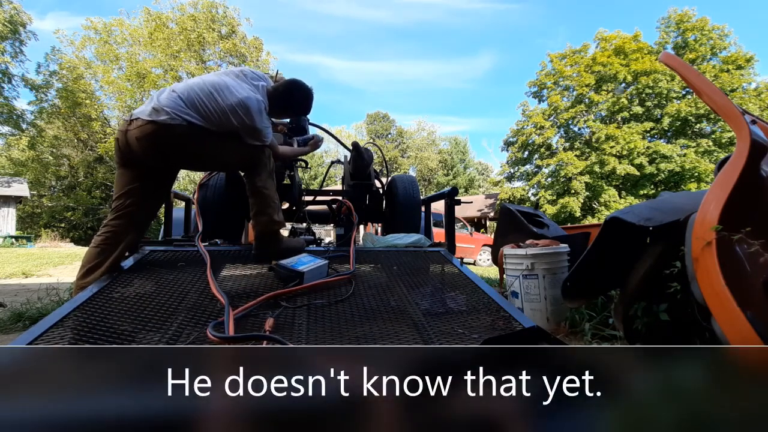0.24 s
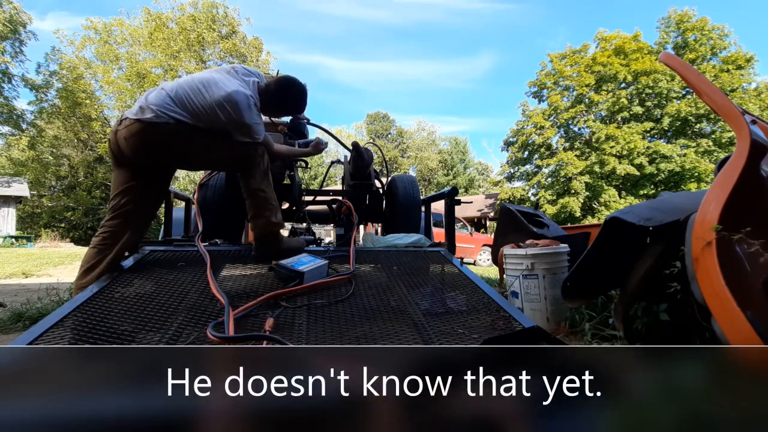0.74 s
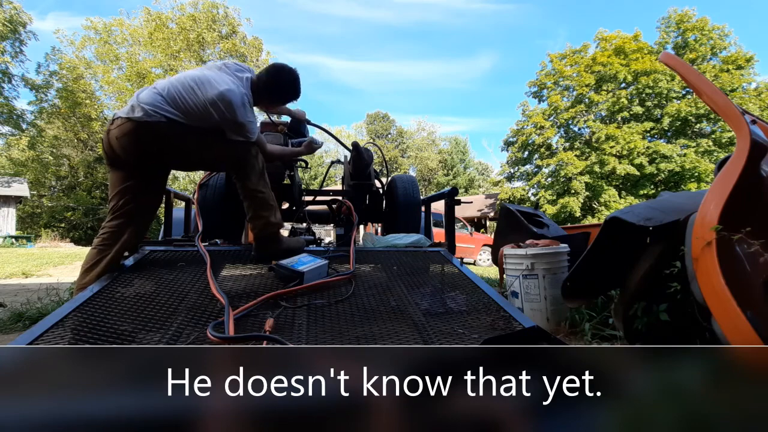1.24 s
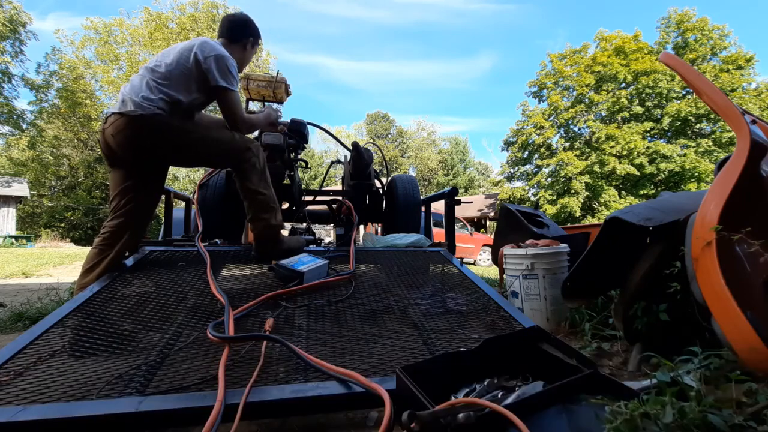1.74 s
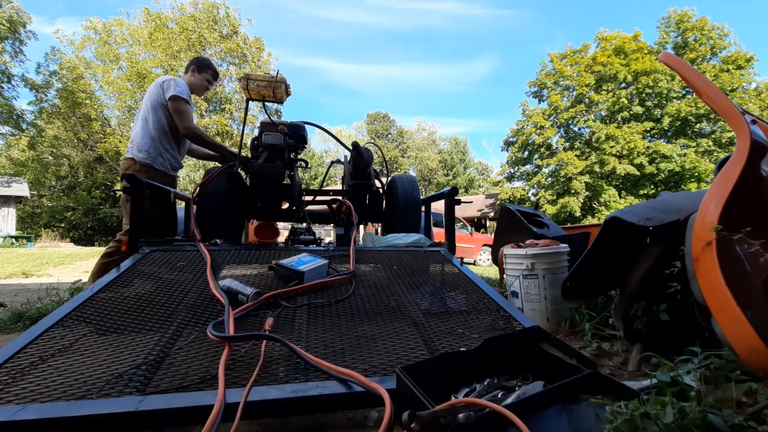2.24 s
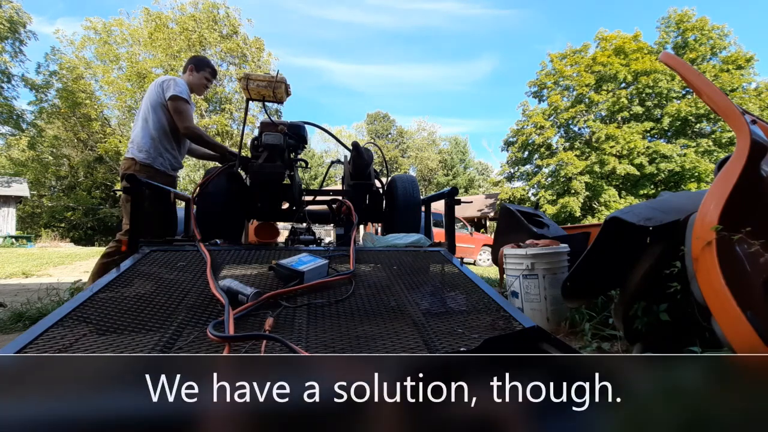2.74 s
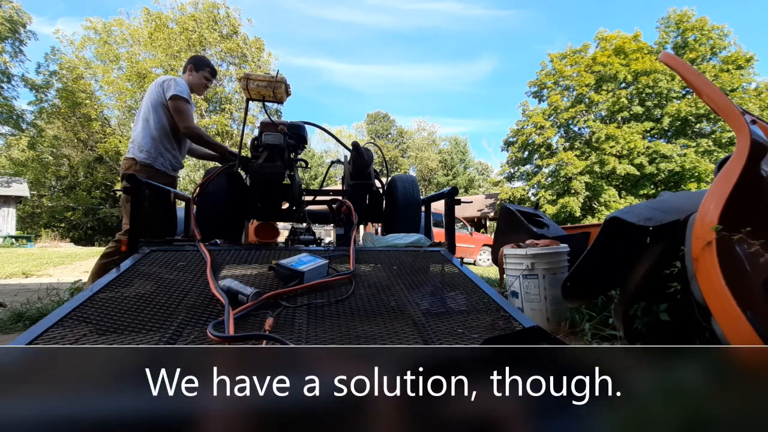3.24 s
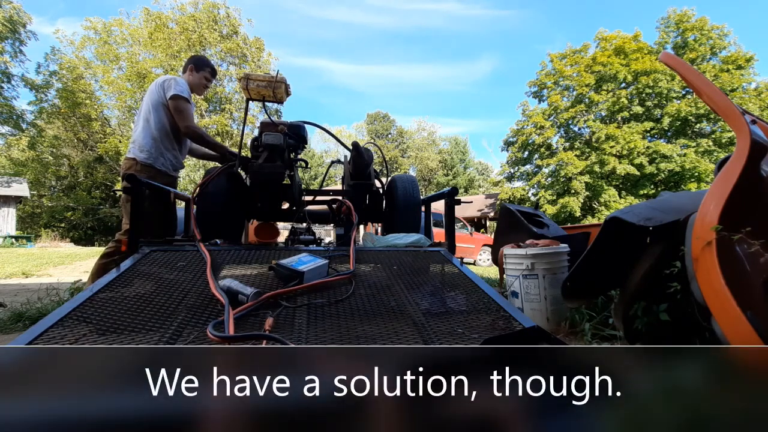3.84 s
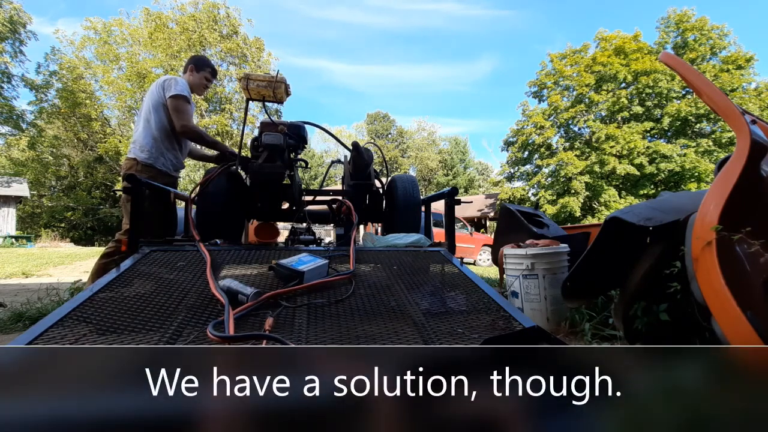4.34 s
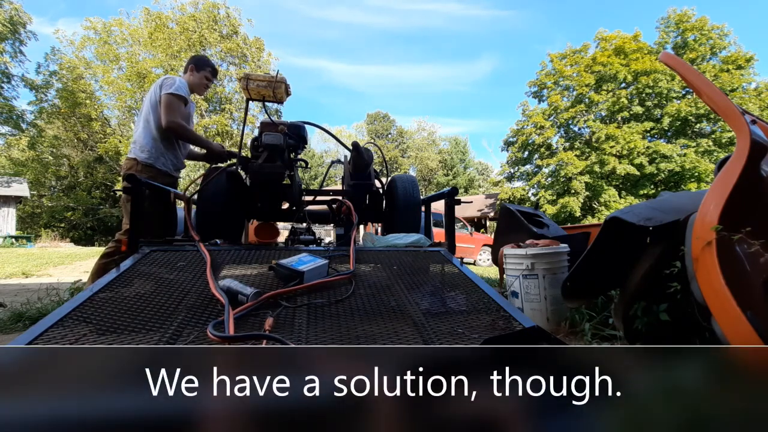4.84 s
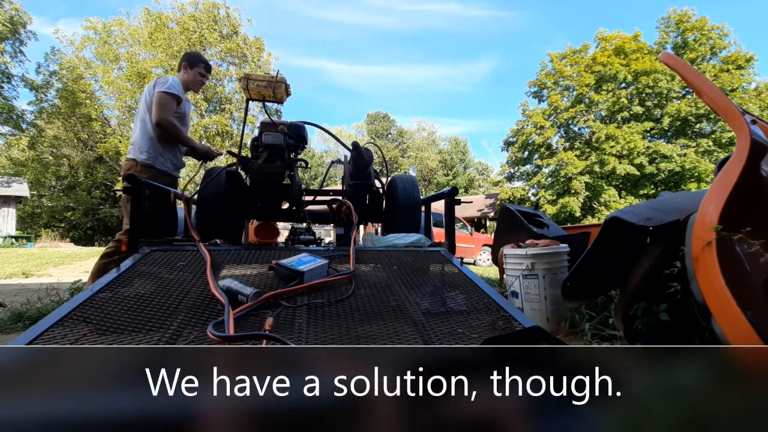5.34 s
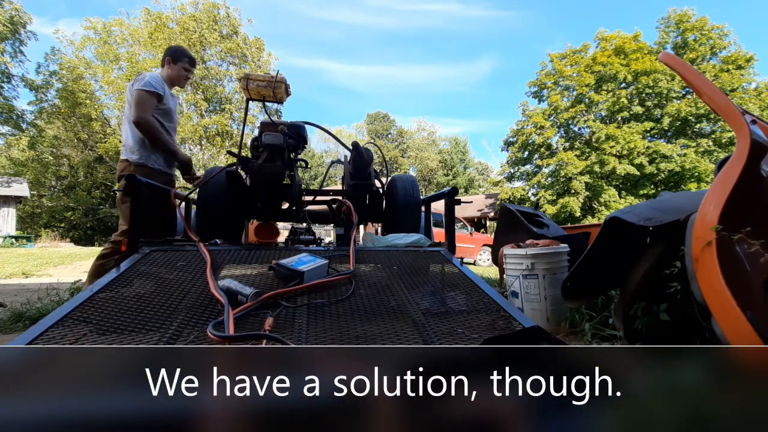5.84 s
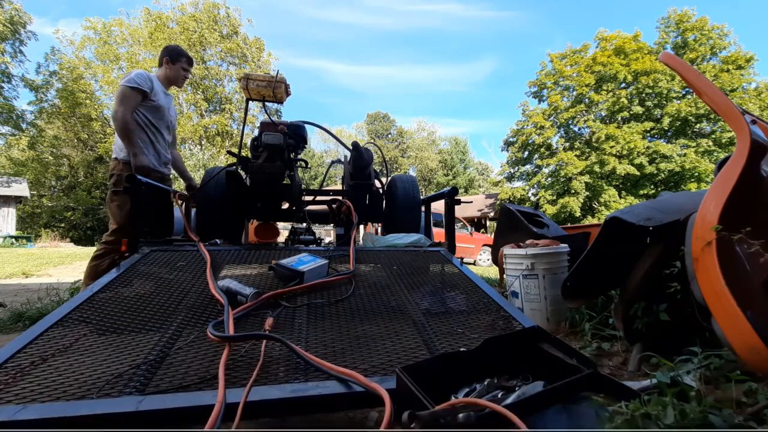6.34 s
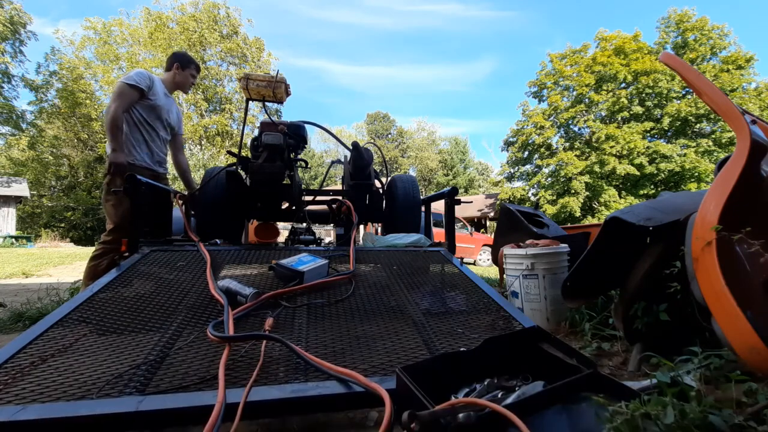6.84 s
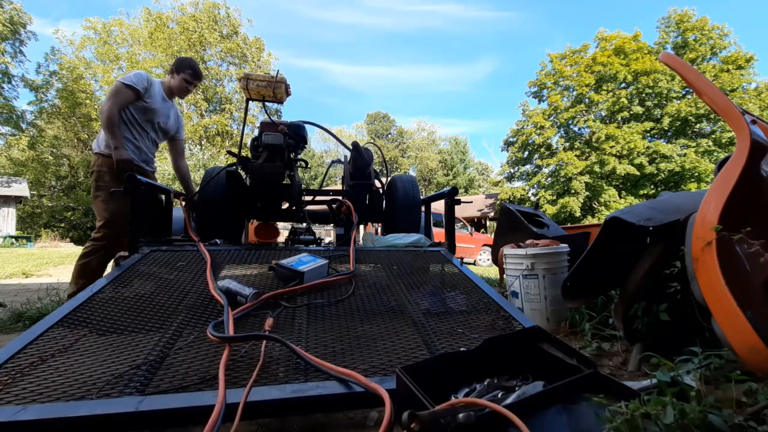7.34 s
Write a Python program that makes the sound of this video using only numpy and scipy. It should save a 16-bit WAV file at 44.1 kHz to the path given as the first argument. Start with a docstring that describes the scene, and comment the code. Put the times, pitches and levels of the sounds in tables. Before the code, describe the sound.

A quiet outdoor yard with high, shimmering insects and a low stir of air. At about 0.3 s a hard clunk strikes a steel deck, followed by knocks and shrinking rattles until about 1.3 s. Near-quiet follows. At 2.0 s a starter pinion slams in and gears whirr up, grinding roughly; from 2.2 s six compressions, about four per second, drag the pitch down and roughen it, with fluttering intake gulps and soft exhaust chuffs. Around 3.4 s the starter races higher and a single-cylinder petrol engine catches with a hard, hissy bang. The second firing, near 3.6 s, is weak; the starter runs down quickly after 3.8 s. The engine then beats steadily, roughly six thumps per second, with sharp hisses, airy gulps and metallic clatter, gradually quicker and stronger to the end at 7.5 s. Close stereo, slightly left, little echo.

```python
"""Over insects and a low stir of air, something clunks on a steel deck and rattles out; a starter then grinds
through six compressions and a single-cylinder petrol engine catches, stumbles once and beats slowly on.
The deck, housing, block, airbox and muffler are banks of resonances, struck or fed with noise and pulses.
Gears are tones at the mesh rate plus shaped noise; each firing gives an exhaust thump, a hiss and a clatter,
each intake a gulp. Scattered sound and a faint tail set it outdoors on a steel trailer."""
import sys
import numpy as np
from scipy import signal
from scipy.fft import rfft, irfft, next_fast_len
from scipy.io import wavfile

SR = 44100
rng = np.random.default_rng(int(sys.argv[2]) if len(sys.argv) > 2 else 0)


def materialize(psi):
    """Save the field psi as 16-bit PCM at rate SR to the path in sys.argv[1].

    A 1-D psi becomes a single channel; in a 2-D psi each row is a channel.
    """
    bounded = np.clip(np.atleast_2d(psi).T, -1, 1)
    quanta = np.round(bounded * 32767).astype(np.int16)
    wavfile.write(sys.argv[1], SR, quanta)


N = 335147
TIME = np.arange(N) / SR
PADDED = 2 * next_fast_len(N // 2 + 1)
FREQS = np.fft.rfftfreq(PADDED, 1 / SR)

# Clunk and rattles on the deck. Each row: start in seconds, relative level in dB.
KNOCK_EVENTS = [(0.268, -16), (0.29, -8), (0.3068, 6), (0.348, 1), (0.357, -5.5), (0.546, -12.5),
                (0.664, -23), (0.816, -20), (0.98, -26.5), (1.131, -32), (1.31, -34)]
# Crankshaft speed once the engine has caught. Each row: time in seconds, speed in rpm.
CRANK_SPEED = [(3.45, 710.6), (3.65, 661.3), (3.85, 813.8), (4.15, 704.5), (4.6, 722.3), (5.55, 728.4),
               (6.4, 771.6), (6.8, 777.8), (7.5, 824.6)]
# Resonances of the deck. Each row: frequency in Hz, width in Hz, relative gain in dB.
DECK_MODES = [(317, 78, -5.5), (490, 62, -16.5), (954, 32, 0), (1030, 40, -2)]
# Resonances of the starter housing. Each row: frequency in Hz, width in Hz, relative gain in dB.
HOUSING_MODES = [(648, 120, -3), (866, 49, -13), (1050, 200, -6.5), (1330, 56, 0), (1587, 31, 8),
                 (1677, 63, 3.5), (1790, 63, -3), (1990, 160, -5.5), (2162, 88, -5.5), (2453, 54, -1),
                 (2850, 56, -3), (6590, 79, -20)]
# Resonances of the starter mount. Each row: frequency in Hz, width in Hz, relative gain in dB.
MOUNT_MODES = [(595, 50, -2), (670, 46, -3), (1320, 74, 2)]
# Resonances of the airbox. Each row: frequency in Hz, width in Hz, gain in dB.
AIRBOX_MODES = [(116, 85, -10.5), (190.5, 29, 4), (299, 20.5, 8)]
# Resonances of the engine block. Each row: frequency in Hz, width in Hz, relative gain in dB.
BLOCK_MODES = [(602, 240, -11), (991, 133, 2.5), (1118, 47, -4), (1210, 30, -4), (1281, 24, 1.5),
               (1496, 37, -12), (1668, 17, -8), (1993, 48, -10), (2080, 16, -15), (2340, 100, -15)]
# Resonances of the muffler. Each row: frequency in Hz, width in Hz, gain in dB.
MUFFLER_MODES = [(88.4, 52, -7.5), (155, 67, -0.5), (299.3, 30.4, 8.5)]
# Spectrum of the insects. Each row: frequency in Hz, relative level per Hz in dB.
INSECT_SPECTRUM = [(3500, -27), (4200, -5.5), (4700, -2), (5400, 0), (5900, -9), (6500, 2.5), (7000, -1.5),
                   (7700, 7.5), (8400, -5), (9300, -16.5), (13000, -11.5), (16000, -13)]
# Narrow shimmer among the insects. Each row: frequency in Hz, relative level per Hz in dB.
SHIMMER_SPECTRUM = [(4000, -20), (4400, 3), (4900, -17)]
# Spectrum of the stirring air. Each row: frequency in Hz, relative level per Hz in dB.
AIR_SPECTRUM = [(25, -21), (70, 5), (150, -5.5), (280, -4.5), (420, -12), (1000, -18.5), (2000, -23),
                (3500, -25.5)]
# Spectrum of the crack in a knock. Each row: frequency in Hz, relative level per Hz in dB.
CRACK_SPECTRUM = [(100, 6.5), (300, 6), (900, 11.5), (1500, -4), (2300, -2.5), (3200, -11), (5500, -24.5),
                  (7500, -20), (10000, -26), (16000, -26.5)]
# Spectrum of the starter's grinding. Each row: frequency in Hz, relative level per Hz in dB.
GRIND_SPECTRUM = [(40, 3), (110, -5.5), (300, 3.5), (420, -26), (900, 5.5), (1400, 3), (1900, 7.5),
                  (2900, 0), (4000, -1.5), (5500, -5.5), (6800, 0.5), (9000, -13.5), (12000, -11),
                  (16000, -24)]
# Spectrum of the shaken works. Each row: frequency in Hz, relative level per Hz in dB.
WORKS_SPECTRUM = [(40, 8), (110, 13), (200, 8.5), (300, 11.5), (420, -1.5), (800, 2.5), (1250, -2),
                  (1800, -3), (3000, -7), (4000, -8), (5700, -3), (7000, -6), (9000, -11), (15500, -14.5)]
# Spectrum of the exhaust jet. Each row: frequency in Hz, relative level per Hz in dB.
JET_SPECTRUM = [(450, 6.5), (800, -2.5), (1100, -5), (1700, -12), (2200, 3.5), (3200, -2.5), (5500, 2.5),
                (7000, 4), (9000, -0.5), (11000, 6), (13000, 6), (16000, -0.5)]
# Spectrum of the jet's sharp edge. Each row: frequency in Hz, relative level per Hz in dB.
EDGE_SPECTRUM = [(9000, -17), (11500, -16), (15500, 10)]
# Left-right likeness of the noisy sounds. Each row: frequency in Hz, likeness from 0 to 1.
SIDE_LIKENESS = [(200, 0.86), (600, 0.42), (2000, 0.28), (16000, 0.1)]
# Strength of the first multiples of the mesh rate, before they ring the housing. Each entry: relative level in dB.
TOOTH_DB = [-1.5, 1.0, -3.5, -1.0]

# Knocks: each is a short impact and a longer shudder; harder ones are brighter
IMPACT_DECAY_S, SHUDDER_DECAY_S, SHUDDER_DB = 0.0034, 0.037, -7.5
CRACK_DB_PER_DB = 0.56

# Starter: it engages, spins up, races once the engine takes the load, then is let go and runs down
STARTER_ON_S, STARTER_ATTACK_S = 2.008, 0.018
INRUSH_DB, INRUSH_PEAK_S, INRUSH_WIDTH_S = 4.5, 2.045, 0.018   # the pinion slams in
ENGAGE_HZ, CRANKING_HZ, SPIN_UP_S = 540.5, 886.7, 0.12   # gear mesh rate before the drag of compressions
FREED_HZ, FREED_S, FREEING_S = 1098, 3.41, 0.052
STARTER_OFF_S, COAST_HZ_PER_S, COAST_DB_PER_S = 3.775, 980, 169
GROAN_DB = -32.5   # the mount groans while the motor labours
WHINE_DB, WHINE_DB_PER_HZ = -46, 0.0386   # the bare mesh tone stands out away from cranking speed

# Engine under the starter: intake strokes, each followed by a compression
FIRST_GULP_S, CRANK_CYCLE_S = 2.1825, 0.2408
CHUFF_DELAY_S = 0.0985   # from a gulp until its unburnt charge leaves the exhaust
CHUFF_DB, FIRST_CHUFF_DB = 3.5, 0.5   # the first charge is a thin one

# Engine running
CATCH_S = 3.4513   # first firing; one more follows every second turn
INTAKE_PHASE = .662   # share of a cycle from exhaust to intake
CATCH_RICH_DB, CATCH_SETTLE_S = 3.5, 0.74   # the first firings hiss harder, then settle
STUMBLE_HISS_DB, STUMBLE_THUMP_DB = -6, -5.5   # the second firing is weak
HISS_DB_PER_RPM, THUMP_DB_PER_RPM = 0.0228, 0.0015   # firings grow stronger with speed
HISS_SPREAD_DB, THUMP_SPREAD_DB = 1.0, 0.4   # chance from one firing to the next

LEFT_LEAD = 6   # samples
CUTOFF_HZ = 15900


def from_db(db):
    """Turn decibels into gain."""
    return 10 ** (np.asarray(db) / 20)


def rms_one(x):
    """Scale to unit rms."""
    return x / np.sqrt(np.mean(x ** 2) + 1e-20)


def noise(spectrum):
    """Unit noise with the given spectrum, falling 24 dB per octave past its ends."""
    hz, db = np.transpose(spectrum)
    octave = np.log2(FREQS + 1)
    outside = np.abs(octave - np.clip(octave, np.log2(hz[0]), np.log2(hz[-1])))
    gain = from_db(np.interp(octave, np.log2(hz), db) - 24 * outside)
    white = rfft(rng.standard_normal(PADDED))
    return rms_one(irfft(white * gain)[:N])


def wide_noise(spectrum):
    """Unit noise on both sides: alike in the bass, less so higher up, and reaching the left first."""
    hz, alike = np.transpose(SIDE_LIKENESS)
    alike = np.clip(np.interp(np.log(FREQS + 1), np.log(hz), alike), 0, 1)
    shared, left, right = (rfft(noise(spectrum), PADDED) for _ in range(3))
    both = np.sqrt(alike) * shared + np.sqrt(1 - alike) * np.array([left, right])
    out = irfft(both)[:, :N]
    return np.array([out[0], np.roll(out[1], LEFT_LEAD)])


def drift(rate):
    """Random wander of unit rms, gliding between the given number of chance values per second."""
    knots = rng.standard_normal(N)
    return rms_one(np.interp(TIME * rate, np.arange(N), knots))


def resonate(x, modes):
    """Ring a bank of parallel resonances, each with its own peak gain."""
    out = 0
    for hz, width, db in modes:
        r = np.exp(-np.pi * width / SR)   # pole radius: wider modes die sooner
        poles = [1, -2 * r * np.cos(2 * np.pi * hz / SR), r * r]
        ring = signal.lfilter([1, 0, -1], poles, x + 1e-18)
        out = out + from_db(db) * (1 - r * r) / 2 * ring
    return out


def swells(times, db, width):
    """A smooth bell of the given width (s) at each time."""
    out = np.zeros(N)
    for s, gain in zip(times, from_db(db) * np.ones(len(times))):
        near = slice(*np.searchsorted(TIME, [s - 10 * width, s + 10 * width]))
        out[near] += gain * np.exp(-.5 * ((TIME[near] - s) / width) ** 2)
    return out


def bursts(times, db, rise, decay):
    """An envelope that opens fast and dies away at each time; rise and decay in seconds."""
    out = np.zeros(N)
    for s, gain in zip(times, from_db(db) * np.ones(len(times))):
        near = slice(*np.searchsorted(TIME, [s, s + 10 * decay]))
        age = TIME[near] - s
        out[near] += gain * (1 - np.exp(-(age / rise) ** 2)) * np.exp(-age / decay)
    return out


def rattle(per_s, spread_db):
    """Random small metal contacts of uneven strength, as clicks of either sign."""
    contact = rng.random(N) < per_s / SR
    sign = rng.choice([-1, 1], N)
    strength = from_db(spread_db * np.clip(rng.standard_normal(N), -2, 2))
    return rms_one(contact * sign * strength)


def yard(x, scatter_db, scatter_s, far_db, far_s):
    """The direct sound reaches the left first; the trailer scatters it and the trees send back a faint tail."""
    age = TIME[:SR // 2]
    above_bass = signal.butter(2, 450, "high", fs=SR, output="sos")
    dulled = signal.butter(1, 3000, fs=SR, output="sos")
    near = signal.sosfilt(above_bass, rng.standard_normal((2, len(age))) * np.exp(-age / scatter_s))
    far = signal.sosfilt(dulled, rng.standard_normal((2, len(age))) * np.exp(-age / far_s))
    paths = sum(from_db(db) * p / np.linalg.norm(p, axis=1, keepdims=True)
                for db, p in [(scatter_db, near), (far_db, far)])
    paths[0, 0] += 1   # direct sound, left then right
    paths[1, LEFT_LEAD] += 1
    return signal.fftconvolve(x[None], paths, axes=1)[:, :N]


def treble_comb(x):
    """Random short echoes above about 3 kHz, different on each side, give the treble a fixed, comb-like colour."""
    paths = np.zeros((2, int(.008 * SR)))
    for side in paths:
        delays = rng.integers(len(side) // 8, len(side) - 40, size=8)
        side[delays] = .2 * rng.choice([-1, 1], size=8)
    paths = signal.sosfilt(signal.butter(2, 3000, "high", fs=SR, output="sos"), paths)
    paths[:, 0] = 1
    return signal.oaconvolve(x, paths / np.linalg.norm(paths, axis=1, keepdims=True), axes=1)[:, :N]


def gulp_times():
    """The starter pulls the engine through evenly spaced intake strokes until it catches."""
    return np.arange(FIRST_GULP_S, CATCH_S, CRANK_CYCLE_S)


def firing_times():
    """The single cylinder fires on every second turn of the crankshaft."""
    running = TIME[TIME >= CATCH_S]
    rpm = np.interp(running, *np.transpose(CRANK_SPEED))
    cycles = np.cumsum(rpm) / (2 * 60 * SR)
    return np.interp(np.arange(int(cycles[-1]) + 1), cycles, running)


def firings():
    """Time, hiss dB and thump dB of each firing: extra hiss at the catch, one stumble, then stronger with speed."""
    fired = firing_times()
    rpm = np.interp(fired, *np.transpose(CRANK_SPEED))
    faster = rpm - np.median(rpm)
    stumble = np.arange(len(fired)) == 1
    chance = rng.standard_normal((len(fired), 2))
    rich_db = CATCH_RICH_DB * np.exp(-(fired - CATCH_S) / CATCH_SETTLE_S)
    hiss_db = rich_db + HISS_DB_PER_RPM * faster + STUMBLE_HISS_DB * stumble + HISS_SPREAD_DB * chance[:, 0]
    thump_db = THUMP_DB_PER_RPM * faster + STUMBLE_THUMP_DB * stumble + THUMP_SPREAD_DB * chance[:, 1]
    return fired, hiss_db, thump_db


def intake_times():
    """One intake stroke in every running cycle."""
    fired = firing_times()
    cycle = np.diff(fired)
    return fired + INTAKE_PHASE * np.append(cycle, cycle[-1])


def background():
    """Insects shrill and shimmer in the trees, as wavering bands of noise, over a low stir of air."""
    insects = np.array([noise(INSECT_SPECTRUM) for side in range(2)]) * from_db(.5 * drift(6.04))
    shimmer = from_db(2.6 * drift(13.9)) * wide_noise(SHIMMER_SPECTRUM)
    air = wide_noise(AIR_SPECTRUM)
    return from_db(-57.5) * insects + from_db(-69) * shimmer + from_db(-67.5) * air


def knock_envelope(s, db):
    """A short impact and a longer, softer shudder at each contact."""
    impact = bursts(s, db, rise=0.00094, decay=IMPACT_DECAY_S)
    shudder = bursts(s, db + SHUDDER_DB, rise=0.0039, decay=SHUDDER_DECAY_S)
    return impact + shudder


def knocks():
    """A clunk and its dwindling rattles: the deck rings, and harder contacts add more crack."""
    deck = rms_one(resonate(rng.standard_normal(N), DECK_MODES))
    ring = yard(deck, scatter_db=-10, scatter_s=0.0013, far_db=-19, far_s=0.026)
    crack = wide_noise(CRACK_SPECTRUM)
    s, db = np.transpose(KNOCK_EVENTS)
    ringing = knock_envelope(s, db)
    cracking = knock_envelope(s, db + CRACK_DB_PER_DB * db)
    return from_db(-27.5) * ringing * ring + from_db(-29.0) * cracking * crack


def starter_motion():
    """Gear mesh Hz and gain of the starter: it engages, spins up, races as it is freed, and coasts down."""
    on, freed, off = (np.maximum(TIME - s, 0) for s in (STARTER_ON_S, FREED_S, STARTER_OFF_S))
    spin_up = (CRANKING_HZ - ENGAGE_HZ) * (1 - np.exp(-on / SPIN_UP_S))
    race = (FREED_HZ - CRANKING_HZ) * (1 - np.exp(-freed / FREEING_S))
    mesh_hz = np.maximum(ENGAGE_HZ + spin_up + race - COAST_HZ_PER_S * off, 0)
    level_db = INRUSH_DB * swells([INRUSH_PEAK_S], 0, width=INRUSH_WIDTH_S) - COAST_DB_PER_S * off
    attack = 1 - np.exp(-(on / STARTER_ATTACK_S) ** 2)
    return mesh_hz, attack * from_db(level_db)


def starter():
    """Rough gear teeth ring the housing; every compression drags the pitch down and makes them grind harder."""
    free_hz, gain = starter_motion()
    squeezed = gulp_times()
    drag = swells(squeezed + .034, 0, width=0.025)
    load = swells(squeezed + 0.02, 0, width=0.012)
    mesh_hz = free_hz * (1 - 0.33 * drag) * (1 + 0.0163 * drift(500))
    turn = 2 * np.pi * np.cumsum(mesh_hz) / SR   # phase of the mesh tone

    teeth = sum(from_db(db + 3.1 * drift(200)) * np.sin((k + 1) * turn) for k, db in enumerate(TOOTH_DB))
    tonal = rms_one(resonate(teeth, HOUSING_MODES))
    rough = rms_one(resonate(rattle(per_s=1000, spread_db=2.5), HOUSING_MODES))
    ringing = from_db(-32.0) * tonal + from_db(-29.5) * rough
    gears = yard(ringing * from_db(4.8 * load), scatter_db=-3.0, scatter_s=0.0014, far_db=-11.5, far_s=0.097)

    grind = from_db(-26.0 + 3.8 * load + 1.87 * drift(400)) * wide_noise(GRIND_SPECTRUM)

    off_speed_db = WHINE_DB_PER_HZ * np.abs(free_hz - CRANKING_HZ)
    whine = from_db(WHINE_DB + 2.8 * drift(90) + 4.4 * drag + off_speed_db) * np.sin(turn)
    labour = swells(np.append(squeezed + 0.029, INRUSH_PEAK_S), 0, width=0.02)
    mount = rms_one(resonate(rattle(per_s=600, spread_db=2.5), MOUNT_MODES))
    groan = from_db(GROAN_DB) * labour * mount
    tones = yard(whine + groan, scatter_db=-12, scatter_s=0.0025, far_db=-13, far_s=0.049)
    return (gears + grind + tones) * gain


def intake():
    """Air flutters through the airbox until the valve shuts on it with a thud."""
    shut = np.append(gulp_times(), intake_times())
    flutter_hz = 305 * (1 + 0.0613 * drift(140))
    flutter_tone = np.sin(2 * np.pi * np.cumsum(flutter_hz) / SR)
    flutter = swells(shut - .013, db=-27.0, width=0.0061) * flutter_tone
    thud = swells(shut, db=-8.5, width=0.00081)
    return flutter - resonate(thud, AIRBOX_MODES)


def works():
    """Each firing shakes the block and its loose parts, which clatter through the cycle, harder with speed."""
    fired = firing_times()
    speed_db = 20 * np.log10(np.median(np.diff(fired)) / np.gradient(fired))
    shaken = bursts(fired - .005, -26 + 0.5 * speed_db, rise=0.014, decay=0.1)
    turning_db = -28.5 + 0.33 * speed_db + rng.normal(0, 0.8, len(fired))
    turning = bursts(fired - .012, turning_db, rise=0.0051, decay=0.12)
    clatter = turning * rms_one(resonate(rattle(per_s=800, spread_db=-0.5), BLOCK_MODES))
    shaking = shaken * wide_noise(WORKS_SPECTRUM) * from_db(0.57 * drift(250))
    return shaking + yard(clatter, scatter_db=-7.0, scatter_s=0.0031, far_db=-9, far_s=0.13)


def exhaust_hiss():
    """Gas jets out as noise at each firing with a sharp edge; a weaker hiss goes with each intake."""
    fired, hiss_db, _ = firings()
    jet = bursts(fired - .0025, hiss_db - 10.0, rise=0.0046, decay=0.0064)
    after = bursts(fired - .008, hiss_db - 26.0, rise=0.0027, decay=0.038)
    suck = swells(intake_times() - .005, -30.5, width=0.0018)
    edge_db = hiss_db - 21.0 + rng.normal(0, 1.2, len(fired))
    edge = bursts(fired - .001, edge_db, rise=0.0017, decay=0.0051)
    flow = np.sqrt(jet ** 2 + after ** 2 + suck ** 2)   # powers add
    hiss = flow * wide_noise(JET_SPECTRUM) + edge * wide_noise(EDGE_SPECTRUM)
    return hiss * from_db(2.1 * drift(1100))


def exhaust_thump():
    """The valve lets out a sharp blow-down, then the piston pushes out the rest; both ring the muffler."""
    fired, _, thump_db = firings()
    blowdown = swells(fired, thump_db - 5, width=0.00094)
    push = swells(fired + .0115, thump_db + 0.15, width=0.0014)
    # while cranking, unburnt charges chuff out softly
    chuff_s = gulp_times()[:-1] + CHUFF_DELAY_S
    chuff_db = np.where(chuff_s == chuff_s[0], FIRST_CHUFF_DB, CHUFF_DB)
    chuff = swells(chuff_s, chuff_db - 12.0, width=0.0024)
    chuff_onset = swells(chuff_s - .0105, chuff_db - 19.5, width=0.00077)
    return -resonate(blowdown + push + chuff + chuff_onset, MUFFLER_MODES)


def scene():
    """The machine stands ahead, its noisy parts slightly to the left, with the background all around."""
    surroundings = background()
    machine = treble_comb(knocks() + starter() + works() + exhaust_hiss())
    bass = yard(intake() + exhaust_thump(), scatter_db=-35, scatter_s=0.036, far_db=-20, far_s=0.029)
    left_db = 1.16
    return surroundings + machine * from_db([[left_db], [-left_db]]) + bass


def record(dry):
    """The deepest bass rolls off and the top is cut steeply."""
    thinned = signal.sosfilt(signal.butter(2, 42, "high", fs=SR, output="sos"), dry)
    return signal.sosfilt(signal.ellip(10, .2, 80, CUTOFF_HZ, fs=SR, output="sos"), thinned)


dry = scene()
out = record(dry)
materialize(out)
```